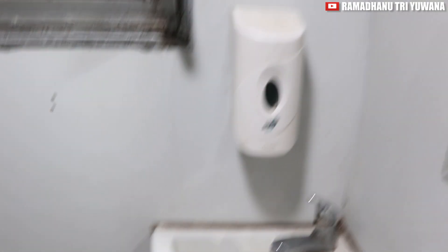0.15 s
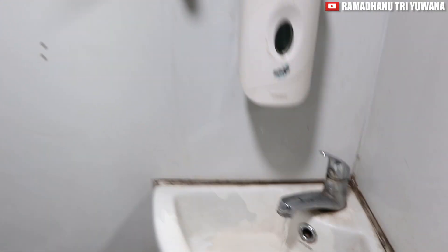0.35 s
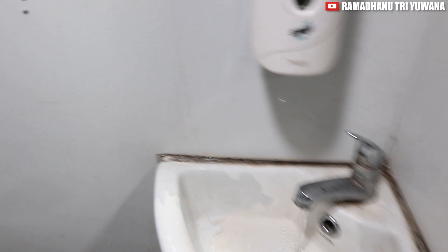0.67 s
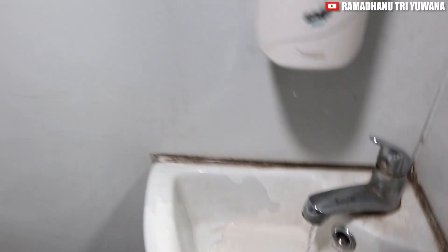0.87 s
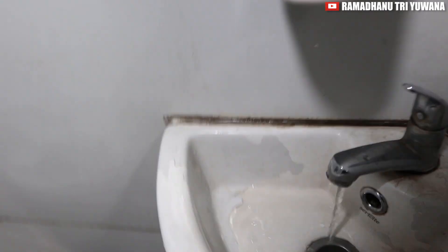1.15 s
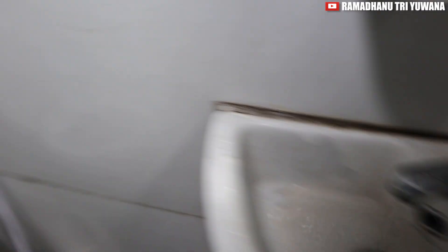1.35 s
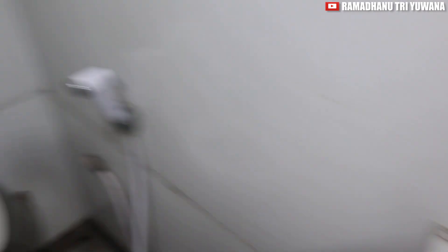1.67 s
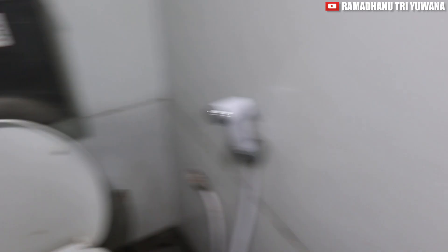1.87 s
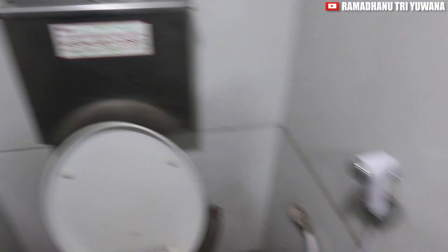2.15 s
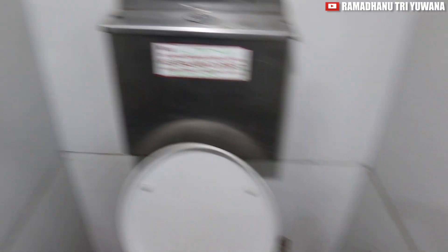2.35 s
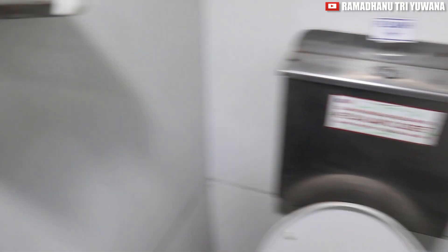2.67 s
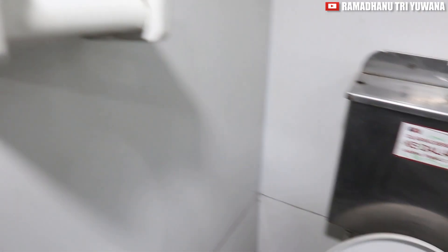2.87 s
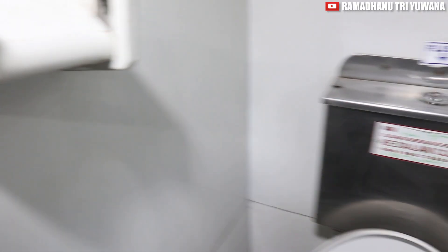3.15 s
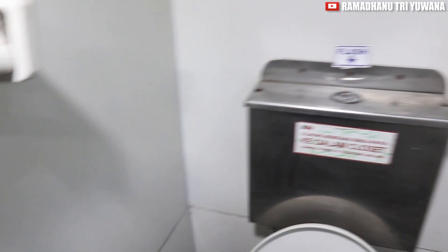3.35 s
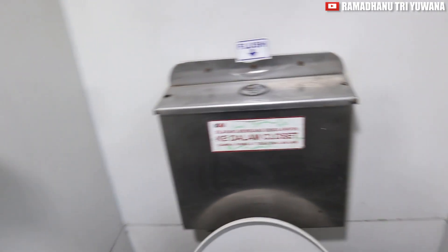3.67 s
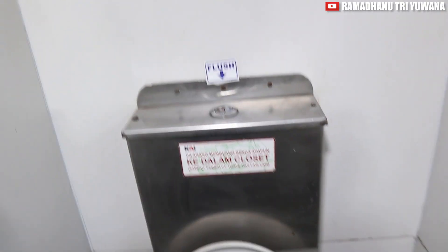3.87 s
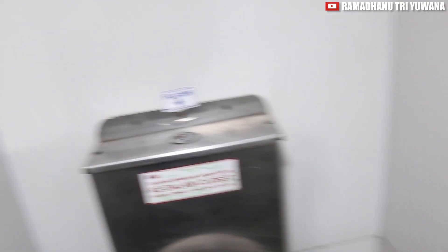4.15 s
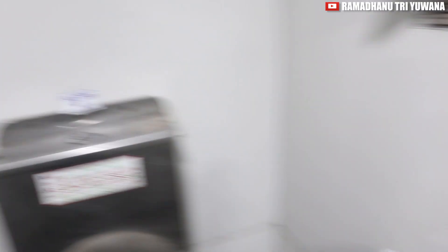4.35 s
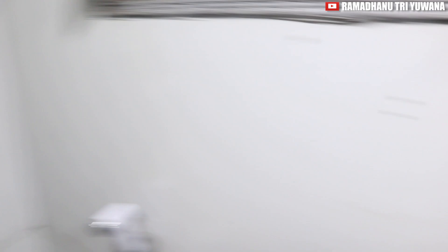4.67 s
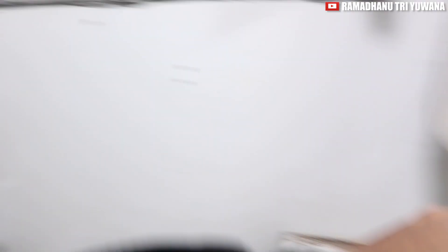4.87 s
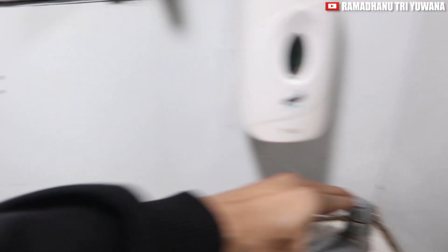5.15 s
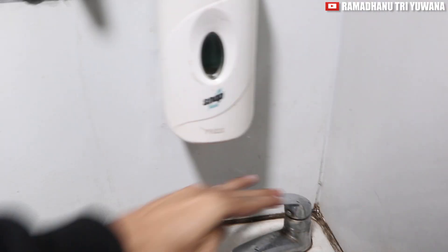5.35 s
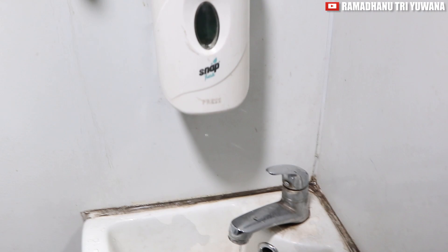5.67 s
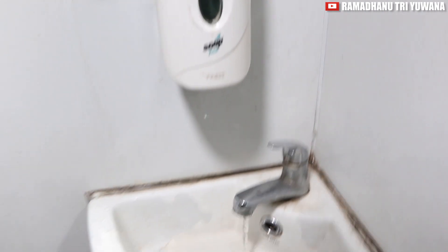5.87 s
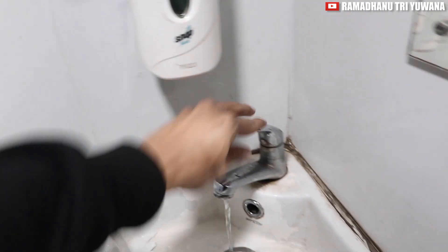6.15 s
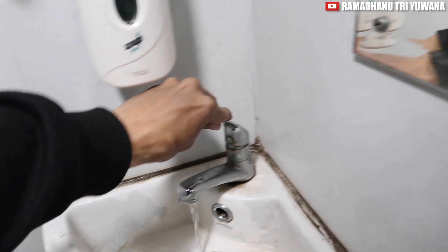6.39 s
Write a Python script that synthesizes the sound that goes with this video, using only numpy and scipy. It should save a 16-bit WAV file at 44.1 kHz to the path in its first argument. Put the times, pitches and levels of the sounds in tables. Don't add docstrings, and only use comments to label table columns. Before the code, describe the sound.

Deep throbbing engine and compressor hum fills a tiny train washroom, with sleeve rustles, small clicks, a hard lid bang and a hollow tap on a fitting.

```python
import sys
import numpy as np
from scipy import signal
from scipy.fft import rfft, irfft, next_fast_len
from scipy.io import wavfile
from scipy.ndimage import uniform_filter1d

SR = 44100
rng = np.random.default_rng(int(sys.argv[2]) if len(sys.argv) > 2 else 0)


def convert_level_to_amplitude(level_db):
    exponent = np.asarray(level_db, float) / 20
    return 10 ** exponent


def log_audio(samples):
    frames = np.atleast_2d(samples).T
    limited = np.clip(frames, -1, 1)
    pcm = np.round(limited * 32767).astype(np.int16)
    wavfile.write(sys.argv[1], SR, pcm)


N = 287532

# time in seconds, place (0 at the sink, 1 at the cistern).
MIC_PLACE = [(0, 0.24), (.5, 0.19), (1.0, 0.11), (1.35, 0.3), (1.7, .5), (2.1, 0.84), (2.6, 1.23),
             (3.05, 0.85), (3.5, 1.08), (4.0, 0.8), (4.4, 0.75), (4.75, 0.68), (5.05, 0.41), (5.35, 0.076),
             (5.8, 0.23), (6.2, 0.15), (6.52, 0.17)]
LID_SHUT_S, LID_SHUT_TAKES_S = 3.16, 0.24

# level at the sink in dB, then dB more at the cistern,
# midway and once the lid is shut.
AIR_LEVELS = [
    (-18, -1, -2.7, 1),
    (-23, 1.5, -4, -2.5),
    (-28.5, 2.5, -1.17, -0.42),
    (-45, 1.4, 2.3, -4.5),
]
# frequency in Hz, density in dB per Hz.
RUMBLE_SPECTRUM = [(12, -30), (20, -17), (45, -0.5), (72, -5), (96, 3.5), (130, 1.5), (165, 1.5),
                   (192, -12.5), (204, -18), (225, -25)]
DRONE_SPECTRUM = [(190, -27), (205, -25), (228, -3.5), (245, -1.5), (325, -3.5), (377, -4.5), (438, -13),
                  (559, -10.5), (750, -9.5), (1020, -17), (1200, -25)]
ROAR_SPECTRUM = [(530, -27), (900, -7.5), (972, 0), (1220, 0), (1520, -3), (2030, -4.5), (2470, -10),
                 (2700, -10), (4800, -25), (6240, -26.5), (10600, -120)]
RUSTLE_SPECTRUM = [(2240, -3), (3800, -2), (4820, -6), (5790, -5), (6890, -8), (8040, -6), (8830, -6.5),
                   (10900, -17), (11700, -21), (12200, -45), (12400, -30), (16200, -63), (22000, -120)]
# centre in Hz, spread in Hz.
CABIN_MODES = [(175, 14.5), (375, 12), (490, 60)]
# level at the sink in dB, then dB more at the cistern, midway and once shut.
CABIN_LEVELS = [(-20, -9.5, 4, -6), (-31, -1, .1, -2), (-37.5, 4.5, 5, 1)]
# peak time in seconds, rise in seconds, fall in seconds, level in dB.
BRUSHES = [(.12, 0.12, 0.24, -42.5), (.52, 0.092, 0.22, -42), (.95, 0.091, 0.13, -38.5),
           (1.62, .06, 0.16, -41.5), (1.85, 0.059, 0.21, -33), (2.58, 0.13, 0.18, -34),
           (2.87, 0.052, 0.073, -45), (3.45, 0.16, 0.099, -38), (3.8, 0.25, 0.39, -43.5),
           (4.35, 0.17, 0.33, -47), (5.55, 0.13, .1, -48), (6.28, 0.26, 0.17, -37.5)]
BRUSH_IN_ROAR_DB = 5.5
# frequency in Hz, level in dB.
FAN_TONES = [(105.64, -32), (161.93, -31), (197.86, -39)]

# start in seconds, peak in dB, centre in Hz, width in Hz, rattle in seconds.
TICKS = [(.615, -21.5, 6000, 900, .0018), (1.189, -28, 8400, 4000, .024), (1.821, -18, 8100, 4000, 0.025),
         (2.354, -28, 5240, 600, 0.023), (2.664, -9, 1470, 1700, 0.024), (2.665, -21, 7050, 5000, 0.011),
         (3.442, -10, 1200, 1500, 0.033), (4.736, -27, 6200, 1100, 0.0043),
         (4.935, -31.5, 9100, 2000, 0.006), (5.25, -47, 8300, 600, 0.0049),
         (6.286, -16, 6460, 4500, 0.0076)]
# peak in dB, centre in Hz, width in Hz, rattle in seconds.
CLASP_PARTS = [(-16.5, 2850, 3400, 0.043), (-23, 6300, 420, 0.027), (-19.5, 7750, 700, 0.025),
               (-18, 9100, 550, 0.019), (-24, 10850, 900, 0.018), (-11, 13700, 3000, .014)]
# peak in dB, centre in Hz, width in Hz, rattle in seconds.
TAP_PARTS = [(-24, 4000, 4000, .007), (-26, 6300, 900, .0033), (-21, 8300, 600, .0062),
             (-35, 8300, 500, .035), (-22, 11000, 2500, .012), (-19, 12600, 1500, .009)]
CLASP_S, TAP_S = 2.242, 5.187
# frequency in Hz, left minus right in dB.
TICK_LEAN = [(3000, 1), (6300, 2), (7800, -4), (9000, -15.5), (13000, -4)]
# start in seconds, strength in dB.
LID_BOUNCES = [
    (3.124, 8.5),
    (3.1286, 9),
    (3.131, -8),
    (3.1321, 0),
    (3.1385, -2),
    (3.1445, -2),
    (3.156, -9),
    (3.175, -3),
]
# centre in Hz, width in Hz, level in dB.
LID_MODES = [(340, 150, -13), (470, 160, 4), (626, 200, -3), (770, 46, -1.5), (1000, 600, -5),
             (1380, 440, -11), (2060, 440, -1), (3300, 520, -11.5), (4500, 3600, -40), (8300, 1500, -22)]
# start in seconds, level in dB, frequency in Hz, 60 dB decay in seconds.
RINGS = [
    (2.243, -9.5, 830, 0.033),
    (3.125, -7.5, 298.5, 0.23),
    (3.126, -4, 556, .06),
    (3.129, -7, 423, 0.065),
    (3.135, -5, 41.8, 0.3),
    (5.187, -7, 1108, 0.042),
    (5.1985, -14.5, 1160, .06),
    (5.2022, -1, 171.5, .2),
    (5.205, -11, 276, 0.063),
    (5.216, -15.5, 1136, 0.067),
]
# peak time in seconds, level in dB.
BOOMS = [(.06, -24), (.5, -20), (1.2, -20), (1.73, -15.5), (2.08, -21), (2.55, -17)]
BOOM_RISE_S, BOOM_FALL_S = 0.083, 0.098

# order, level at the sink in dB, then dB more at the cistern, midway and once shut.
PUMP_ORDERS = [(1, -36, .1, .1, -13)]
BELT_ORDERS = [(1, -41.5, .1, .1, 10), (2, -31.5, 2.9, .1, -19)]
GENERATOR_ORDERS = [(5, -24, 3, -1, -0.5), (8, -30, 3, 1, 4), (12, -44, 2, 12, 1), (15, -36.5, -2, -2, 3),
                    (20, -27, 2.5, -9.5, -7)]
COMPRESSOR_ORDERS = [(1, -21.5, -7, -4, -10), (2, -26, -1.9, -2.5, 8), (3, -16, -5.5, -0.2, -1.5),
                     (4, -44.5, -2, 11, 0), (5, -28.5, -3, -9, 1), (6, -37.5, 7.5, -5, -0.2),
                     (8, -42.5, 3, -11, .1), (9, -43, 10.5, 2.5, .1), (12, -42, 11, -4, 1)]
PUMP_HZ, PUMP_START_TURNS = 45.42, .06
BELT_HZ, BELT_START_TURNS = 24.6, .168
GENERATOR_HZ, CRANK_START_TURNS = 12.503, .096
COMPRESSOR_HZ, COMPRESSOR_START_TURNS = 47.78, .137

ROOM_T60_S, ROOM_DB = 0.18, -7.5
# frequency in Hz, side minus mid in dB.
PORT_WIDTH = [(40, -38), (110, -35), (190, -23.5), (350, -20), (630, -15), (1140, -11.5), (2050, -7),
              (3690, -2), (6660, 1.3), (10000, 3.5), (12000, 12.5), (14000, 18)]
# frequency in Hz, left minus right in dB.
PORT_LEAN = [(600, 0), (1200, .6), (3700, 0), (6700, -1.5), (10000, -4), (13000, -1)]
PORT_LEAD_SAMPLES, BLOW_LEAD_SAMPLES = 0.41, 1
MIC_EDGE_HZ = 11000
# time in seconds, gain in dB.
GAIN_CONTROL = [(0, 1.34), (3.15, -0.35), (3.22, -9.5), (3.4, -10.5), (4.3, 0), (5.19, 1.1), (5.3, -2.5),
                (5.55, 0.64), (6.52, 0.4)]


def unit_rms(x):
    return x / np.sqrt(np.mean(x ** 2) + 1e-20)


def read(points, hz):
    f, value = np.transpose(points)
    return np.interp(np.log(hz + 1), np.log(f + 1), value)


def curve(rows, column, t):
    table = np.array(rows)
    return np.interp(t, table[:, 0], table[:, column])


def swell(t, peak_s, rise_s, fall_s):
    return np.exp(-((t - peak_s) / np.where(t < peak_s, rise_s, fall_s)) ** 2)


def add(mix, start_s, sound):
    part = mix[..., round(start_s * SR):][..., :sound.shape[-1]]
    part += sound[..., :part.shape[-1]]


def resonate(x, hz, width_hz):
    b, a = signal.iirpeak(min(hz, SR / 2.2), max(hz / width_hz, .3), SR)
    return signal.lfilter(b, a, x)


def heard(t, db, cistern_db, midway_db, shut_db):
    place = curve(MIC_PLACE, 1, t)
    shut = np.clip((t - LID_SHUT_S) / LID_SHUT_TAKES_S, 0, 1)
    return convert_level_to_amplitude(db + cistern_db * place + midway_db * np.sin(np.pi * place) ** 2 + shut_db * shut)


def brushing(t):
    return sum(convert_level_to_amplitude(db) * swell(t, s, rise_s, fall_s) for s, rise_s, fall_s, db in BRUSHES)


def noise(layers, size, patchy_db, flicker_db, patch_hz):
    hop = size // 4
    frames, hz = N // hop + 5, np.fft.rfftfreq(size, 1 / SR)
    t = np.arange(frames) * hop / SR
    a, b, c, d, patches = rng.standard_normal((frames, len(hz), 5)).T
    patches = uniform_filter1d(patches, size=round(patch_hz / hz[1]), axis=0)
    patches = unit_rms(uniform_filter1d(patches, size=8, axis=1))
    flicker = unit_rms(uniform_filter1d(rng.standard_normal(frames), size=3))
    power = 0
    for shape, levels, cloth_share in layers:
        density = shape(hz) / shape(hz).sum()
        power = power + np.outer(density, heard(t, *levels) ** 2 + (cloth_share * brushing(t)) ** 2)
    treble = np.clip(hz / 5000, 0, 1)[:, None]
    texture_db = patchy_db * patches + flicker_db * flicker * treble
    z = np.array([a + 1j * b, c + 1j * d]) * np.sqrt(power) * convert_level_to_amplitude(texture_db)
    return 1.2 * signal.istft(z, nperseg=size, noverlap=size - hop)[1][:, :N]


def band(points):
    return lambda hz: convert_level_to_amplitude(read(points, hz)) ** 2 * (hz >= points[0][0]) * (hz <= points[-1][0])


def mode(centre_hz, spread_hz):
    return lambda hz: np.exp(-((hz - centre_hz) / spread_hz) ** 2 / 2)


def air():
    rumble, drone, roar, rustle = AIR_LEVELS
    low = [(band(RUMBLE_SPECTRUM), rumble, 0), (band(DRONE_SPECTRUM), drone, 0)]
    low += [(mode(*shape), levels, 0) for shape, levels in zip(CABIN_MODES, CABIN_LEVELS)]
    high = [(band(ROAR_SPECTRUM), roar, convert_level_to_amplitude(BRUSH_IN_ROAR_DB)), (band(RUSTLE_SPECTRUM), rustle, 1)]
    bass = noise(low, size=4096, patchy_db=2.5, flicker_db=6, patch_hz=35)
    return bass + noise(high, size=1024, patchy_db=0.91, flicker_db=0.5, patch_hz=500)


def fan():
    t = np.arange(N) / SR
    return sum(np.sqrt(2) * convert_level_to_amplitude(db) * np.sin(2 * np.pi * (hz * t + rng.random())) for hz, db in FAN_TONES)


def ticks():
    out, t = np.zeros((2, N)), np.arange(6000) / SR
    blows = [(CLASP_S, *part) for part in CLASP_PARTS]
    blows += [(TAP_S, *part) for part in TAP_PARTS]
    blows += list(TICKS)
    for s, db, hz, width_hz, rattle_s in blows:
        drive = rng.standard_normal(len(t)) * np.exp(-(t / rattle_s) ** 2)
        ring = resonate(resonate(drive, hz, 0.96 * width_hz), hz, 0.96 * width_hz)
        lean_db = read(TICK_LEAN, hz) * np.array([[.5], [-.5]])
        add(out, s, convert_level_to_amplitude(db + lean_db) * ring / abs(ring).max())
    return out


def knock():
    drive, t = np.zeros(N), np.arange(400) / SR
    for s, db in LID_BOUNCES:
        crack = 0.5 + rng.standard_normal(len(t))
        add(drive, s, convert_level_to_amplitude(db) * crack * np.exp(-t / 0.002) * np.minimum(t / 0.00089, 1))
    return sum(convert_level_to_amplitude(db) * resonate(drive, hz, width_hz) * np.sqrt(9000 / width_hz) / 5
               for hz, width_hz, db in LID_MODES)


def rings():
    out, t = np.zeros(N), np.arange(6000) / SR
    for s, db, hz, t60_s in RINGS:
        onset = np.minimum(t * hz / 2.0, 1)
        add(out, s, convert_level_to_amplitude(db - 60 * t / t60_s) * np.sin(2 * np.pi * hz * t) * onset)
    return out


def panel():
    t = np.arange(N) / SR
    booms = sum(convert_level_to_amplitude(db) * swell(t, s, BOOM_RISE_S, BOOM_FALL_S) for s, db in BOOMS)
    return np.sqrt(2) * booms * np.sin(2 * np.pi * (COMPRESSOR_HZ * t + COMPRESSOR_START_TURNS))


def machine(hz, orders, start_turns, waver_turns):
    t = np.arange(N) / SR
    drift = sum(np.sin(2 * np.pi * (f * t + rng.random())) / f for f in np.geomspace(.5, 6, 12))
    turns = hz * t + waver_turns * unit_rms(drift)
    out = np.zeros(N)
    for order, *levels in orders:
        k = round(order)
        out += np.sqrt(2) * heard(t, *levels) * np.sin(2 * np.pi * (k * turns + start_turns(k)))
    return out


def hum():
    pump = machine(PUMP_HZ, PUMP_ORDERS, lambda k: PUMP_START_TURNS, .01)
    belt = machine(BELT_HZ, BELT_ORDERS, lambda k: k * BELT_START_TURNS, .002)
    generator = machine(GENERATOR_HZ, GENERATOR_ORDERS, lambda k: k * CRANK_START_TURNS, .001)
    compressor = machine(COMPRESSOR_HZ, COMPRESSOR_ORDERS, lambda k: COMPRESSOR_START_TURNS * k ** 2, .004)
    return pump + belt + generator + compressor


def room(x):
    taps = np.zeros((2, 12000))
    at = np.arange(100, 11980, 20) + rng.integers(0, 20, (2, 594))
    np.put_along_axis(taps, at, rng.choice([-1., 1.], at.shape), 1)
    taps *= convert_level_to_amplitude(-60 * np.arange(12000) / SR / ROOM_T60_S)
    return signal.oaconvolve(x[None], taps / np.linalg.norm(taps[0]), axes=1)[:, :N]


def ports(mid, side):
    size = next_fast_len(N)
    hz = np.fft.rfftfreq(size, 1 / SR)
    m = rfft(mid, size)
    s = rfft(side, size) * convert_level_to_amplitude(read(PORT_WIDTH, hz))
    lean = convert_level_to_amplitude(read(PORT_LEAN, hz) / 2) * np.exp(1j * np.pi * hz * PORT_LEAD_SAMPLES / SR)
    return irfft(np.array([(m + s) * lean, (m - s) / lean]), size)[:, :N]


def scene():
    capsule = signal.butter(6, MIC_EDGE_HZ, fs=SR, output="sos")
    blows = signal.sosfilt(capsule, ticks() + knock())
    echoes = signal.sosfilt(capsule, room(blows.mean(0)))
    diffuse = air() + convert_level_to_amplitude(ROOM_DB) * echoes
    left, right = blows
    direct = np.array([np.roll(left, -BLOW_LEAD_SAMPLES), np.roll(right, BLOW_LEAD_SAMPLES)])
    return ports(*diffuse) + fan() + direct + rings() + panel() + hum()


def top_cut(x):
    return signal.sosfilt(signal.butter(12, 14600, fs=SR, output="sos"), x)


def record(dry):
    ducked = dry * convert_level_to_amplitude(curve(GAIN_CONTROL, 1, np.arange(N) / SR))
    rounded = np.clip(1.35 * np.tanh(ducked / 1.35), -1, 1)
    return top_cut(rounded)


dry = scene()
out = record(dry)
log_audio(out)
```